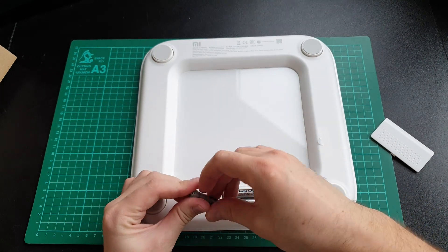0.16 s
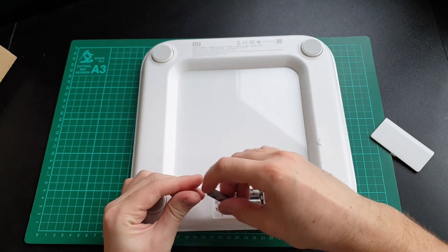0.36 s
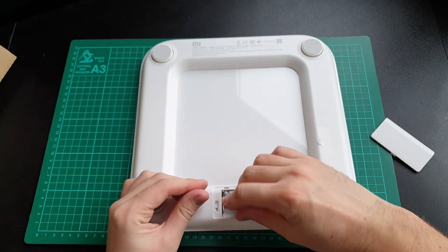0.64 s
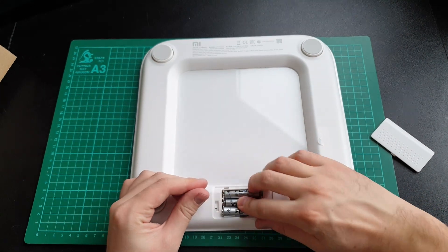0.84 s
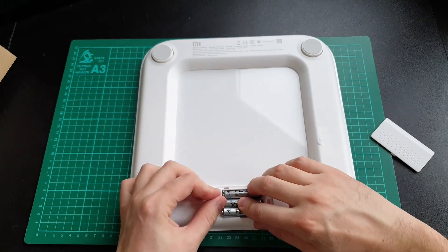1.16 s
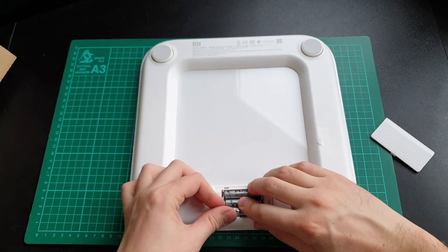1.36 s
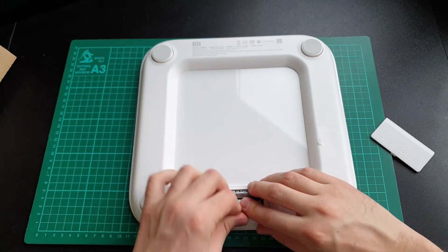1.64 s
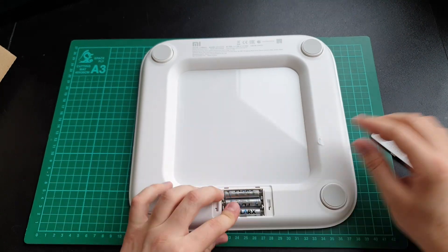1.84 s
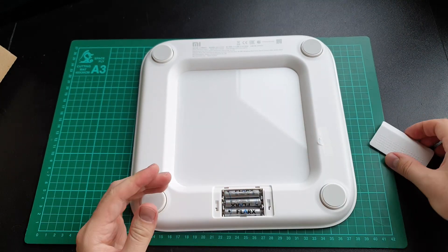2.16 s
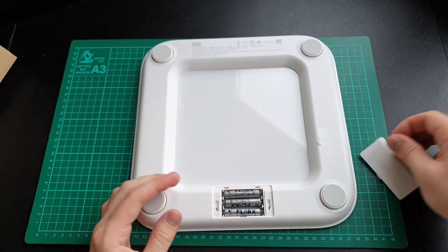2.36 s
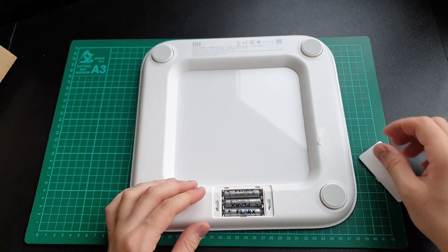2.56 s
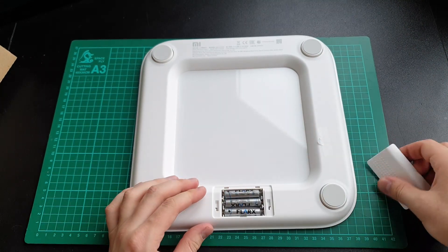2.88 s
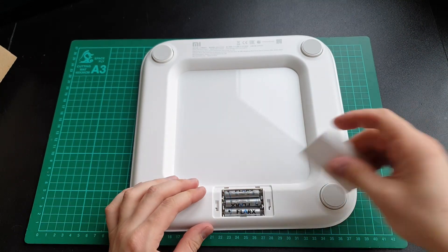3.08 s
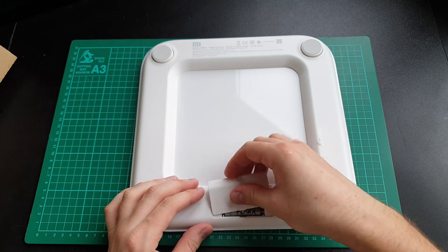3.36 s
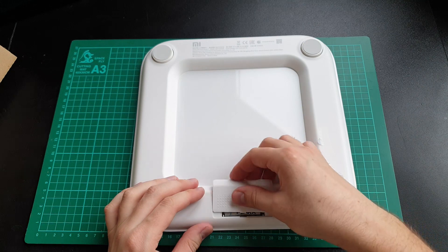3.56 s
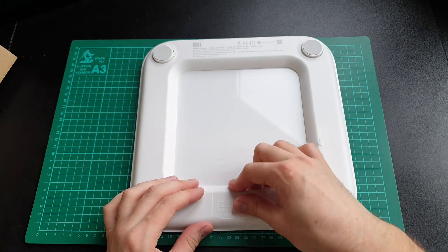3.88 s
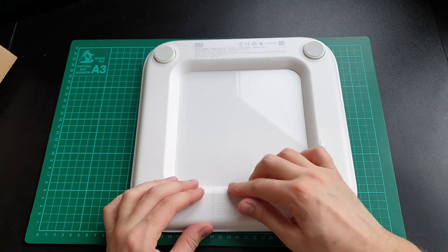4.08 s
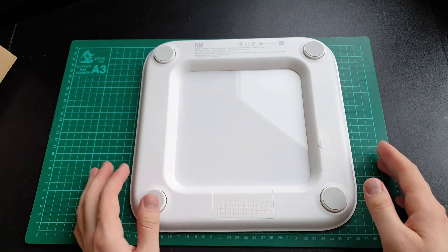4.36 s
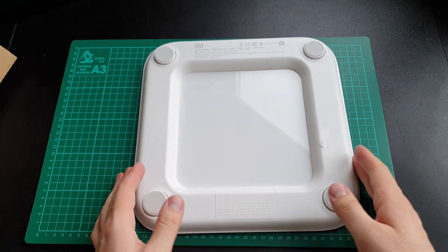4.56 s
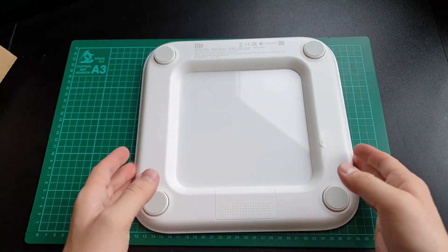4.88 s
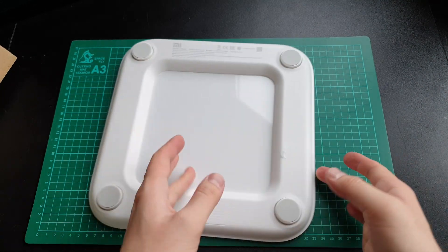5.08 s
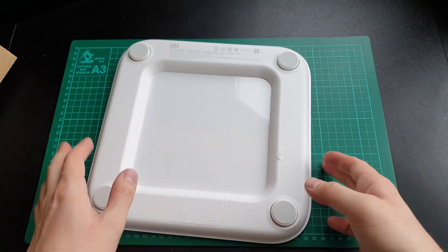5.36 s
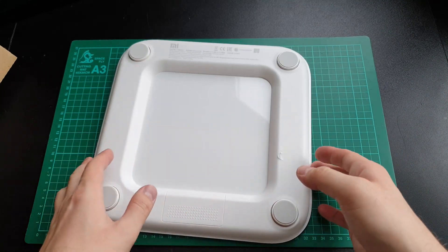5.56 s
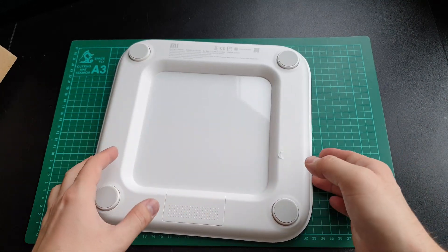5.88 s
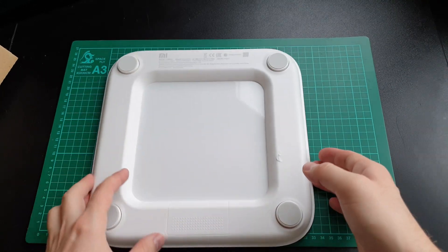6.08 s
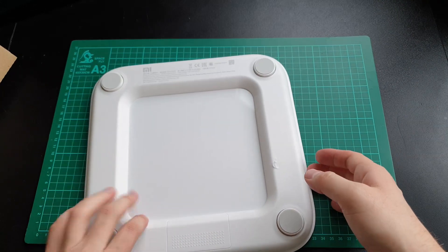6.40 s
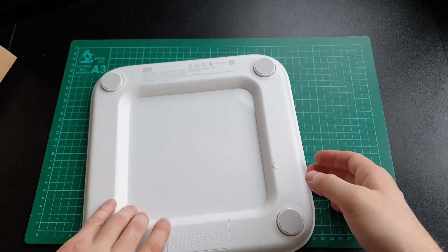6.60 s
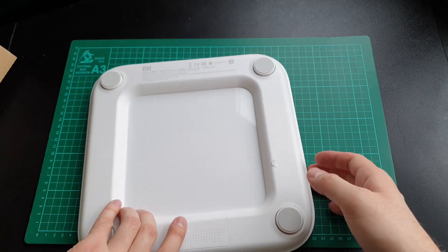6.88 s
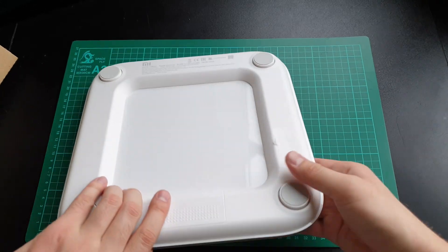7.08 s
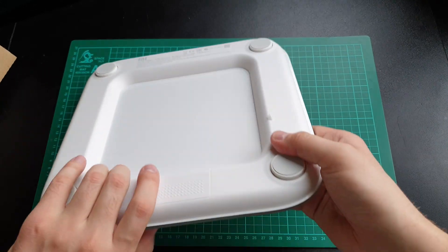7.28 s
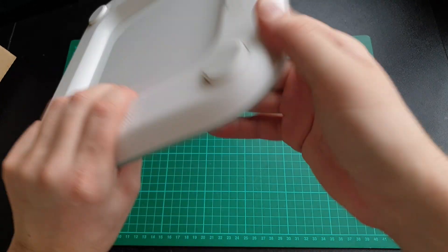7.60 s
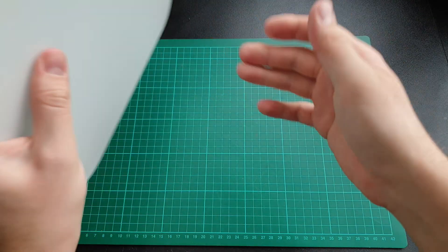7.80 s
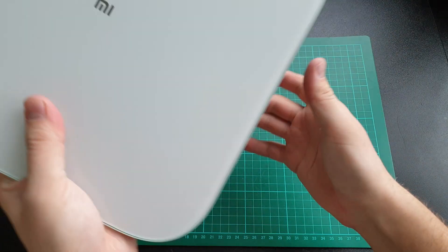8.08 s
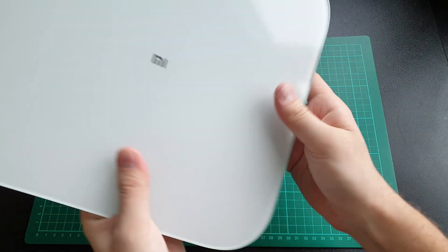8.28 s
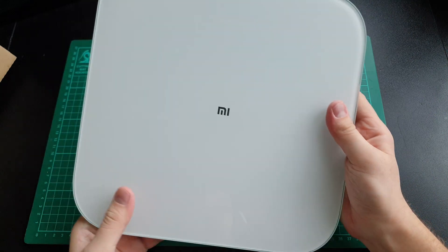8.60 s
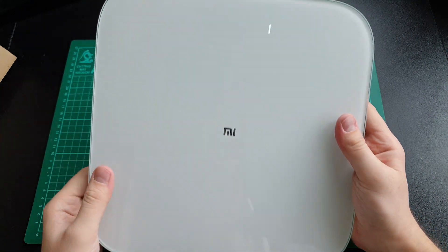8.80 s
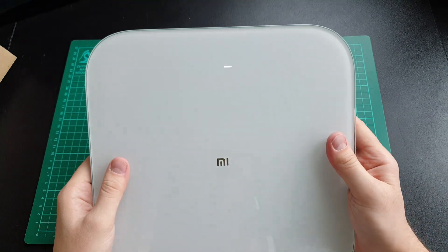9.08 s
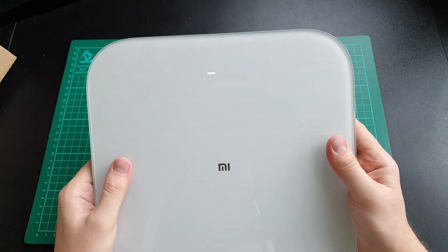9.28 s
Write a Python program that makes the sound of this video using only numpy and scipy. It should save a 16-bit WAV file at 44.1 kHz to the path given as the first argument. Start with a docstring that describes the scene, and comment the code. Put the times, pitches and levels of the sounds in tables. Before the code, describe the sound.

Hard plastic clicks and clatters, one loud snap of a cover, then soft rubbing, dull desk thumps and a hand slap on a plate.

```python
"""Batteries and a lid click into the hollow plastic shell of a scale lying on a desk, in a small quiet room:
bursts of micro-impacts ring the shell modes. Then hands slide the scale over the mat, lift it and turn it over:
random slips rub as skin and scrape the shell, uneven jerks judder, and the low modes of the desk top boom.
Late on, the plate is slapped into the hand and flutters over a hollow note until the grip lets go.
Sparse echoes and a steady faint hush of shaped noise lie under it all."""
import sys
import numpy as np
from scipy import signal
from scipy.fft import rfft, irfft
from scipy.io import wavfile
from scipy.ndimage import uniform_filter1d

SR = 44100
rng = np.random.default_rng(int(sys.argv[2]) if len(sys.argv) > 2 else 0)


def wav_record(signal):
    """Record a signal, one row per channel, as 16-bit PCM in the file named by sys.argv[1]."""
    frames = np.transpose(np.atleast_2d(signal))
    bounded = np.clip(frames, -1, 1)
    # unit amplitude maps onto the largest positive 16-bit level
    quanta = np.round(bounded * 32767).astype(np.int16)
    wavfile.write(sys.argv[1], SR, quanta)


def boost_factor(decibels):
    """Convert a level in decibels to a linear amplitude factor."""
    exponent = np.asarray(decibels, float) / 20
    return 10 ** exponent


N = 416744


def evened(x):
    """Scales to rms 1."""
    return x / np.sqrt(np.mean(x ** 2) + 1e-20)


def read(points, hz):
    """Value of a spectrum at hz, on a log axis."""
    f, value = np.transpose(points)
    return np.interp(np.log(hz + 1), np.log(f + 1), value)


def add(mix, s, sound):
    """Mixes a sound in at time s."""
    part = mix[:, round(s * SR):][:, :sound.shape[1]]
    part += sound[:, :part.shape[1]]


# Left-right likeness of diffuse sound. Each row: frequency in Hz, likeness 0 to 1.
ALIKE = [(60, 0.86), (290, 0.58), (640, 1), (1200, 0.), (8000, 0.071)]


def likened(first, other, hz):
    """Pairs two unrelated spectra, alike as far as diffuse sound is at each frequency."""
    same = read(ALIKE, hz)
    return np.array([first, same * first + np.sqrt(1 - same ** 2) * other])


def diffuse(x, gain, size=512):
    """Colours two unrelated channels by gain(hz, t) and makes them alike in the bass."""
    hz, t, z = signal.stft(x, SR, nperseg=size, noverlap=3 * size // 4)
    z = likened(z[0], z[1], hz[:, None]) * gain(hz[:, None], t)
    return signal.istft(z, SR, nperseg=size, noverlap=3 * size // 4)[1][:, :x.shape[1]]


def near(hz, centre_hz, octaves):
    """The place of contact favours the modes near one pitch."""
    return np.exp(-.5 * (np.log2((hz + 1) / centre_hz) / octaves) ** 2)


def response(modes, hz):
    """Complex response of each resonant mode, one row a mode."""
    f, width, db = np.transpose(modes)[:, :, None]
    return boost_factor(db) * 1j * hz * width / (f ** 2 - hz ** 2 + 1j * hz * width)


def chatter(noise, t, decay_s):
    """Spectrum of a burst of micro-impacts, nearly even over frequency."""
    z = rfft(noise * np.exp(-t / decay_s))
    even = irfft(z / (abs(z) + 0.12 * abs(z).mean()))
    return rfft(even * np.exp(-t / (4 * decay_s)))


def stroke(t, s, db, rise_s, fall_s):
    """Gain of one stroke, straight in dB up to its peak and down; rise and fall are times for 20 dB."""
    return boost_factor(db - 20 * np.maximum((s - t) / rise_s, (t - s) / fall_s))


def strokes(rows, t):
    """Summed gain of overlapping strokes, and their last column weighted by power."""
    s, db, rise_s, fall_s, value = np.transpose(rows)[:, :, None]
    power = stroke(t, s, db, rise_s, fall_s) ** 2 + 1e-30
    return np.sqrt(power.sum(0)), (power * value).sum(0) / power.sum(0)


def patchy(hz, t, db):
    """The colour drifts at random, in soft patches of time and pitch."""
    field = rng.standard_normal((len(hz), len(t)))
    field = uniform_filter1d(uniform_filter1d(field, size=6, axis=0), size=40, axis=1)
    return boost_factor(db * evened(field))


def grit(per_s, spread_db):
    """Tiny slips of uneven size at random times, two unrelated channels, rms 1."""
    slips = (rng.random((2, N)) < per_s / SR) * rng.standard_normal((2, N))
    return evened(slips * boost_factor(spread_db * np.minimum(rng.exponential(1, N), 4)))


# Hard contacts. Each row: time in seconds, ring peak in dB, centre of the ring in Hz,
# crack in dB above the ring, low knock in dB above the ring.
CLICKS = [(0.495, -24, 1278, -13, -21.5), (0.505, -27, 1230, -10, -12.5), (0.556, -29.5, 1258, -6, -25.5),
          (0.652, -42, 1214, -20, -13.5), (0.662, -34, 1301, -5.5, -3.5), (0.689, -3.5, 1654, -5.5, -25.5),
          (0.76, -33, 1071, -19, -26), (0.77, -22.5, 1322, -16, -35), (1.087, -42.5, 1079, -28, -27.5),
          (1.096, -43.5, 1264, -18, -5.5), (1.138, -32, 1035, -26, -21.5), (1.342, -30, 1131, -9.5, -23.5),
          (1.542, -21, 1250, -0.5, -20.5), (1.698, -16, 1559, -5.5, -13), (1.997, -41.5, 1210, -38, -23),
          (2.066, -40.5, 1150, -15.5, -13), (2.26, -34.5, 1200, -16, -31), (2.287, -30.5, 1264, -3, -20),
          (2.308, -22, 2166, 4, -18.5), (2.352, -38, 1010, 15.5, -8.5), (2.379, -24.5, 1420, 8, -19),
          (2.388, -20.5, 1130, 7, -14.5), (2.469, -36, 1260, -27.5, -37.5), (2.672, -43, 1081, -11, -9.5),
          (2.723, -34, 1220, -11, -8), (2.819, -45.5, 1202, -34, -6), (2.92, -40, 1390, 0, -20.5),
          (3.284, -28, 1200, 5, -17.5), (3.293, -26.5, 1312, -3, -12.5), (3.366, -43.5, 1150, -0.5, -7),
          (3.398, -29.5, 1463, -10.5, -28), (3.468, -33.5, 1291, -6.5, -23.5),
          (3.494, -15.5, 1497, -7, -30.5), (3.613, -38, 2932, 7, -21.5), (3.638, -39.5, 1248, -16, -24),
          (3.687, -44.5, 1610, -16.5, -27.5), (3.708, -33.5, 1048, -11.5, -28),
          (3.889, -8.5, 1030, -1, -19), (4.177, -42, 950, -31, -17), (4.528, -72, 790, 10, -10.5),
          (4.898, -30.5, 1150, -6.5, 4), (4.937, -41, 905, -1, -4), (4.985, -50.5, 1050, -20, 7),
          (5.022, -40, 1100, -15, -5), (5.06, -49.5, 950, -20, 6.5), (5.117, -56, 940, 6, -6),
          (5.418, -61, 1287, -5, 7), (5.865, -62.5, 1230, -10.5, 0.5), (6.065, -52, 700, -15, 4),
          (6.192, -64, 1127, -3, 2), (6.84, -56.5, 1348, -24, -19.5), (6.93, -57.5, 1026, -27.5, -27.5),
          (7.167, -48.5, 1185, -17, -10), (7.27, -39, 1036, -27, -13), (8.097, -59, 2900, 8.5, -26.5),
          (8.258, -54.5, 1360, -7.5, 3), (8.367, -51, 1490, 4, -24), (8.496, -43.5, 1090, 8, -31),
          (9.016, -41, 1010, -7.5, 5)]
# Modes of the plastic shell. Each row: frequency in Hz, width in Hz, relative level in dB.
SHELL = [(538.7, 180, -8.5), (700, 180, -5.5), (836, 110, 0), (1010, 190, 3.5), (1124, 260, 2.5),
         (1250, 87, 3), (1480, 85, -3.5), (1650, 130, -3.5), (1830, 110, 0), (2130, 170, -2),
         (2323, 250, -4), (2574, 140, -2), (2900, 790, -1.5), (3200, 1600, -6), (3820, 130, -9),
         (4250, 350, -13.5), (4770, 450, -13)]
# Crack spectrum. Each row: frequency in Hz, relative level in dB per Hz.
CRACK = [(1470, -32.5), (2500, -3), (3270, -2), (3710, -2.5), (6450, -1.5), (10200, -10.5), (12000, -5.5),
         (12900, -17), (15700, -11.5), (16500, -22.5)]
# The whole shell flexing. Each row: frequency in Hz, relative level in dB per Hz.
KNOCK = [(150, -4), (250, 7), (400, 8.5), (650, 5.5), (1000, -53)]
# Modes of the loose lid. Each row: frequency in Hz, width in Hz, relative level in dB among themselves.
LID = [(3085, 30, -9.5), (4560, 60, 1.5), (5030, 48, -0.5), (5250, 19, -17), (6310, 73, -3),
       (7710, 480, -10), (11750, 79, -3), (12650, 100, -7.5), (14800, 120, -8)]
LID_LOOSE_START_S, LID_LOOSE_END_S = 2.27, 2.95  # the lid clatters on the mat
CRACK_TOP_HZ = 9000  # where a middling crack turns dull; harder ones reach higher
RATTLE_DB, RATTLE_DB_PER_DB = -0.5, 0.13  # room feed over the click; harder blows rattle on more


def clicks(size=4096):
    """Milliseconds of chatter ring the shell, with a bright crack and a low knock; row 3 feeds the room."""
    t, hz = np.arange(size) / SR, np.fft.rfftfreq(size, 1 / SR)
    out = np.zeros((3, N))
    modes, mode_hz = response(SHELL, hz), np.transpose(SHELL)[0]
    signs = (-1) ** np.arange(len(SHELL))
    late = np.exp(-2j * np.pi * hz * .002)  # 2 ms delay, undone when mixed in
    for s, db, ring_hz, crack_db, knock_db in CLICKS:
        noise = rng.standard_normal((5, size))
        strength_db = db + 30
        # harder blows chatter longer and wake more modes
        length_s = .0016 * boost_factor(0.38 * strength_db)
        octaves = 0.35 * boost_factor(0.38 * strength_db)
        weights = (near(mode_hz, ring_hz, octaves) + 0.084) * signs
        left, other = chatter(noise[:2], t, length_s)
        ring = irfft(likened(left, other, hz) * (weights @ modes) * late)

        bright = boost_factor(read(CRACK, hz))
        if LID_LOOSE_START_S < s < LID_LOOSE_END_S:
            bright = bright + 4 * response(LID, hz).sum(0)
        tick = chatter(noise[2:4], t, .0004)  # the first touch is a single sharp tick
        burst = chatter(noise[2:4], t, 2.8 * length_s) + 0.26 * tick
        top_hz = CRACK_TOP_HZ * boost_factor(0.9 * (strength_db + crack_db + 8.5))
        crack = irfft(burst * bright * late / (1 + (hz / top_hz) ** 2))

        flex = chatter(noise[4:], t, 0.0045) * boost_factor(read(KNOCK, hz))
        knock = irfft(flex * late ** 2)  # 2 ms behind the ring
        click = np.zeros((2, size))
        for part_db, part in ((0, ring), (crack_db, crack), (knock_db, knock)):
            peak = max(abs(part.mean(0)).max(), abs(part).max() / 2)
            click += boost_factor(db + part_db) * part / peak
        rattle = boost_factor(RATTLE_DB + RATTLE_DB_PER_DB * (strength_db - 20)) * click[:1]
        add(out, s - .002, np.vstack([click, rattle]))
    return out[:2], out[2]


def scrape(rows, octaves, per_s, spread_db):
    """Slips excite the shell modes around a wandering pitch."""
    def gain(hz, t):
        level, centre_hz = strokes(rows, t)
        focus = near(hz, centre_hz, octaves) + 0.46 * octaves * near(hz, 1500, octaves=0.93)
        shell = abs(response(SHELL, hz[:, 0])).sum(0)[:, None]
        colour = (shell + 4.5) * focus
        return level * patchy(hz, t, db=3.0) * colour / np.sqrt((colour ** 2).mean(0))
    return diffuse(grit(per_s, spread_db), gain)


# Each row: peak time in seconds, level in dB, rise in seconds, fall in seconds, centre of the ring in Hz.
GRAZES = [(.548, -50, 0.038, 0.11, 1250), (.67, -42, 0.038, 0.17, 1410), (1.074, -53.5, 0.022, 0.039, 1030),
          (1.612, -56.5, 0.26, 0.12, 1180), (1.9, -67, 0.094, 0.24, 1300), (2.0, -54.5, .012, 0.043, 1163),
          (2.038, -41, .03, .09, 1160), (2.256, -39.5, 0.017, 0.075, 1250), (2.5, -68, 0.105, .1, 1190),
          (2.68, -49, 0.0079, 0.082, 1244), (2.732, -34.5, 0.027, 0.018, 1210),
          (2.848, -54, 0.12, 0.029, 1220), (2.925, -44.5, 0.018, 0.055, 2050), (3.582, -49, .1, .13, 1363),
          (5.5, -69.5, 0.04, 0.15, 1200), (6.02, -81, 0.079, 0.091, 1180), (7.474, -67, 0.083, 0.11, 1054),
          (7.61, -66.5, 0.11, 0.052, 990)]


def grazes():
    """Narrow grainy shell rings from sparse slips: grazes and the dying tails of clicks."""
    return scrape(GRAZES, octaves=0.24, per_s=830, spread_db=3.0)


# Each row: peak time in seconds, level in dB, rise in seconds, fall in seconds, centre of the ring in Hz.
SLIDES = [(3.48, -53.5, 0.012, 0.083, 1600), (4.3, -76.5, .1, 0.14, 612), (4.534, -76, 0.18, 0.086, 1650),
          (4.635, -63.5, 0.036, .2, 622), (4.776, -50.5, 0.13, 0.11, 756), (4.86, -54.5, .15, .15, 630),
          (4.9, -47, 0.026, 0.11, 585), (5.02, -45, 0.091, 0.06, 1000), (5.08, -49, .1, 0.017, 920),
          (5.37, -71.5, 0.018, 0.082, 597), (5.44, -68.5, 0.027, 0.11, 850),
          (5.648, -51.5, 0.0067, 0.091, 563), (5.704, -42.5, 0.054, 0.035, 600),
          (5.868, -70, 0.0099, 0.22, 685), (6.09, -55.5, 0.061, 0.067, 607), (6.198, -65.5, .03, 0.16, 880),
          (6.44, -71.5, 0.047, 0.21, 1203), (6.58, -68.5, 0.26, 0.063, 1291),
          (6.846, -65.5, 0.042, 0.078, 1350), (6.93, -62.5, 0.021, .1, 1230),
          (7.166, -55, 0.0082, 0.065, 1220), (7.272, -51, 0.012, 0.057, 990), (7.71, -69, .025, 0.046, 575),
          (7.8, -78.5, .05, 0.46, 985), (8.102, -70.5, 0.016, 0.047, 2177),
          (8.265, -63.5, 0.016, 0.25, 1340), (8.375, -70, 0.01, .2, 1790), (8.44, -58, 0.14, 0.034, 2250),
          (8.498, -39.5, 0.0063, 0.015, 1180), (8.54, -73, 0.041, 0.1, 670),
          (8.75, -72.5, 0.098, 0.14, 1500), (8.96, -68.5, 0.23, 0.051, 2380),
          (9.016, -48.5, 0.0058, 0.041, 496), (9.346, -72.5, 0.74, 0.67, 1000)]


def slides():
    """The whole scale is dragged or gripped: denser slips, a wide ring."""
    return scrape(SLIDES, octaves=0.79, per_s=1400, spread_db=1.0)


# Skin and sleeve sliding. Each row: peak time in seconds, level in dB, rise in seconds, fall in seconds,
# air above about 8 kHz in dB relative to the body.
RUBS = [(.718, -46, 0.035, .14, -2.5), (1.16, -72.5, 0.33, 0.19, -20), (1.704, -64, 0.38, 0.11, -4),
        (1.914, -69, 0.0085, 0.061, -30), (2.064, -61, 0.054, 0.07, -3.5), (2.26, -54.5, .025, 0.075, 2),
        (2.41, -49.5, 0.073, 0.062, 7.5), (2.7, -53.5, 0.015, 0.11, -6.5), (2.752, -52, 0.034, 0.023, -21),
        (2.924, -45.5, .02, 0.058, -6.5), (3.072, -68, .3, 0.053, 4), (3.194, -72.5, 0.056, 0.062, -2),
        (3.342, -51, 0.029, 0.13, -7.5), (3.578, -66.5, .055, 0.34, 1.5), (4.05, -67, 0.22, .2, 1.5),
        (4.35, -77.5, 0.13, .3, 1.5), (4.44, -76, 0.093, 0.091, 7.5), (4.52, -70, 0.07, 0.078, 4),
        (4.81, -55.5, 0.09, 0.093, -25.5), (4.9, -55, 0.02, 0.028, -10), (5.06, -51.5, 0.42, 0.091, -2),
        (5.34, -70, 0.092, 0.076, -5), (5.45, -60.5, 0.05, 0.056, -16), (5.71, -64, 0.076, 0.052, -5),
        (6.12, -75, 0.27, 0.12, -4.5), (6.21, -73, 0.051, 0.34, -8), (6.33, -71, 0.095, .07, 3.5),
        (6.44, -67, 0.058, 0.14, -2.5), (6.56, -62, 0.068, 0.091, 1), (6.84, -78, 0.071, 0.092, -11),
        (6.99, -78.5, .17, 0.14, -5), (7.17, -68.5, 0.047, .07, -11.5), (7.32, -63, 0.14, 0.11, -1),
        (7.48, -69, .1, 0.064, -5), (7.59, -50.5, 0.046, 0.059, 5), (7.81, -68, 0.047, 0.069, -5),
        (7.9, -70.5, 0.1, 0.11, -3), (8.1, -59.5, 0.0091, 0.067, -19.5), (8.31, -63, 0.084, 0.23, -4.5),
        (8.45, -48.5, 0.091, 0.1, -1), (8.51, -52.5, 0.21, 0.042, 1), (8.74, -56.5, 0.19, .3, -0.7),
        (8.62, -67.5, .1, .2, 4.5), (8.9, -60.5, .3, .15, 1.5), (9.03, -56, .07, 0.035, -4.5),
        (9.32, -76.5, 0.16, 0.22, -25)]
# Skin spectrum. Each row: frequency in Hz, relative level in dB per Hz.
SKIN = [(710, -33), (1200, -7.5), (1690, -5.5), (2760, -8), (6860, 1.5), (8360, -9.5), (11500, -7),
        (15100, -10.5), (16000, -7), (16500, -29)]


def rub():
    """Fine dense slips of skin: a soft hiss whose airiness varies from stroke to stroke."""
    def gain(hz, t):
        level, air_db = strokes(RUBS, t)
        airy = 1 / (1 + (8300 / (hz + 1)) ** 12)
        skin = boost_factor(read(SKIN, hz))
        body, air = (part / np.sqrt((part ** 2).mean()) for part in (skin * (1 - airy), skin * airy))
        return level * patchy(hz, t, db=1.5) * (body + boost_factor(air_db) * air)
    return diffuse(grit(per_s=13000, spread_db=3.0), gain, size=256)


# Rubber and glass juddering over the mat. Each row: start in seconds, end in seconds,
# base rate in slips per second (spacings are 0.46 to 1.2 of its period), full-push jerk peak in dB before scatter.
JUDDERS = [(4.911, 5.086, 55, -47), (5.63, 5.721, 170, -40), (6.055, 6.128, 130, -44.5)]
# Jerk spectrum. Each row: frequency in Hz, relative level in dB per Hz.
JUDDER = [(150, -2), (300, 9.5), (620, 12.5), (1000, -7.5), (1600, -28), (2400, -9.5), (3500, -20),
          (6000, -55), (12000, -39.5)]


def judder(size=1024):
    """Unevenly spaced stick-slip jerks, growing through the push."""
    train = np.zeros((2, N))
    for start, end, per_s, db in JUDDERS:
        at = start + np.cumsum(rng.uniform(0.46, 1.2, 40) / per_s)
        push = .5 + .5 * (at - start) / (end - start)
        sizes = boost_factor(db + 2.5 * rng.standard_normal(40)) * push
        keep = at < end
        train[:, (at[keep] * SR).astype(int)] = sizes[keep]
    t, hz = np.arange(size) / SR, np.fft.rfftfreq(size, 1 / SR)
    late = np.exp(-2j * np.pi * hz * 0.00286)
    jerk = irfft(chatter(rng.standard_normal((1, size)), t, 0.0022) * boost_factor(read(JUDDER, hz)) * late)
    return signal.fftconvolve(train, jerk / abs(jerk).max(), axes=1)[:, :N]


# Modes of the slapped plate. Each row: frequency in Hz, width in Hz, relative level in dB.
PLATE = [(950, 27, -5), (1030, 24, 9.5), (1062, 24, 8), (1150, 36, -17)]
SLAP_S, DRUM_S, RELEASE_S = 8.5, 8.535, 8.75  # slap, top of the hollow note, grip let go
DRUM_HZ, DRUM_WIDTH_HZ = 394, 40


def plate():
    """Noise in close modes flutters at random as it dies, until the grip lets go; a hollow note swells under."""
    t, hz = np.arange(N) / SR, np.fft.rfftfreq(N, 1 / SR)
    z = rfft(rng.standard_normal((2, 2, N)))
    high = evened(irfft(z[0] * response(PLATE, hz).sum(0), N))
    hollow = response([(DRUM_HZ, DRUM_WIDTH_HZ, 0)], hz)[0] ** 2
    low = evened(irfft(z[1, 0] * hollow, N))
    release = np.clip((RELEASE_S - t) / 0.021, 0, 1)
    flutter = stroke(t, SLAP_S, db=-51.5, rise_s=0.0073, fall_s=0.347) * release * high
    return flutter + stroke(t, DRUM_S, db=-45, rise_s=.03, fall_s=.035) * low


# Weight landing on the desk. Each row: time in seconds, first-mode peak in dB, boost of the upper modes in dB.
THUMPS = [(0.515, -59, 6), (0.691, -38.5, -8), (0.76, -47, 5.5), (1.09, -57.5, -5), (1.541, -32.5, -9.5),
          (1.697, -39, 3.5), (1.939, -54, -15.5), (2.401, -57.5, 9.5), (2.702, -58, 12.5), (3.284, -57, -7),
          (3.708, -54, -6), (3.887, -41, 6.5), (4.307, -59.5, -10.5), (4.419, -50.5, -26),
          (4.449, -43.5, -4), (4.706, -49.5, -13.5), (4.898, -40.5, 10.5), (4.939, -31.5, -5),
          (5.061, -36, -6), (5.37, -59, 1), (5.427, -47, 4), (5.489, -55, -5), (5.651, -52.5, 4.5),
          (6.075, -64, 10), (6.219, -48, -23), (6.444, -38.5, -8), (6.311, -60, -10), (6.525, -49, -8),
          (6.828, -56.5, 6), (7.125, -54, 2.5), (7.166, -45, 11.5), (7.243, -51, 4), (7.739, -59.5, -21.5),
          (8.279, -52, 3), (9.02, -24.5, 2.5), (9.367, -55, -4.5)]
# Modes of the desk top. Each row: frequency in Hz, relative level in dB, undamped t60 in seconds.
DESK = [(61.7, -1.5, 0.36), (77, -10, 0.15), (122.7, 1.5, 0.13), (195, -18, 0.12), (242, -16, 0.093),
        (312, -20, 0.096)]
# Low murmur of the desk top, faint thumps included. Each row: time in seconds, level in dB.
MURMUR = [(0.0, -76.5), (1.47, -78), (1.6, -52.5), (1.72, -71), (2.05, -77), (2.97, -73.5), (3.3, -79),
          (3.47, -64), (3.87, -73.5), (4.42, -67), (4.8, -52), (4.92, -62), (5.03, -42), (5.16, -68.5),
          (6.5, -66.5), (7.5, -71.5), (9.0, -74), (9.2, -59.5), (9.45, -65)]
THUMP_RISE_S = .013
THUMP_STOP_S = .16  # the hands damp the desk: 20 dB more is lost by then


def desk():
    """Soft blows ring the low modes of the desk top; noise through the same modes, heavily damped, murmurs."""
    t, out = np.arange(SR // 2) / SR, np.zeros((2, N))
    hz, db, t60_s = np.transpose(DESK)[:, :, None]
    lead = np.array([.2, -.2])[:, None, None]  # radians: left leads right slightly in phase
    tones = boost_factor(db) * np.sin(2 * np.pi * hz * t + lead)
    rings = tones * boost_factor(-60 * t / t60_s - 20 * (t / THUMP_STOP_S) ** 2)
    rise = 1 - np.exp(-(t / THUMP_RISE_S) ** 2)
    first_peak = abs(rings[0, 0] * rise).max()
    for s, peak_db, upper_db in THUMPS:
        blow = rings[:, 0] + boost_factor(upper_db) * rings[:, 1:].sum(1)
        add(out, s - .004, boost_factor(peak_db) * blow * rise / first_peak)
    damped = (tones * np.exp(-t / 0.0067) * boost_factor(-.03 * hz)).sum(1)
    murmur = signal.fftconvolve(rng.standard_normal((1, N)), damped, axes=1)[:, :N]
    murmur_db = np.interp(np.arange(N) / SR, *np.transpose(MURMUR))
    return (out + boost_factor(murmur_db) * evened(murmur)) * boost_factor([[-.5], [.5]])  # right 1 dB louder


# Decay of the first echoes. Each row: frequency in Hz, t60 in seconds.
ROOM = [(250, 0.37), (1000, 0.13), (2000, 0.23), (5000, 0.21), (12000, 0.16)]
LATE_DB, LATE_T60_S = -21.5, 0.43  # a weak slower tail under the first echoes


def room(x, count=3):
    """Sparse echoes, each band dying at its own speed; slow turns share the sound among several tails."""
    def decay(hz, t):
        early = boost_factor(-60 * t / read(ROOM, hz))
        return (early + boost_factor(LATE_DB - 60 * t / LATE_T60_S)) * np.minimum(t / 0.0011, 1)
    out, turn = np.zeros((2, N)), np.arange(N) / SR * 2.3
    slots = np.arange(120, SR // 2 - 10, 10)
    for k in range(count):
        taps = np.zeros((2, SR // 2))
        at = slots + rng.integers(0, 10, (2, len(slots)))
        np.put_along_axis(taps, at, rng.choice([-1., 1.], at.shape), 1)
        tail = diffuse(taps, decay, size=128)
        share = np.sqrt(2 / count) * np.cos(np.pi * (turn + k / count))
        out += signal.fftconvolve((x * share)[None], tail / np.linalg.norm(tail[0]), axes=1)[:, :N]
    return out


# Room tone and microphone hiss. Each row: frequency in Hz, relative level in dB per Hz.
HUSH = [(15, -34.5), (25, -9.5), (53, 1.5), (95, -10), (131, -16.5), (214, -10.5), (232, -26), (259, -11.5),
        (304, -24.5), (349, -11.5), (378, -26.5), (600, -23), (8370, -38.5), (14800, -25), (16500, -50.5)]
HUSH_DB = -74


def hush():
    """Steady faint background: noise shaped by one fixed spectrum."""
    noise = diffuse(rng.standard_normal((2, N)), lambda hz, t: boost_factor(read(HUSH, hz)), size=2048)
    return boost_factor(HUSH_DB) * evened(noise)


def scene():
    """Hard and soft contacts with their room, over the desk and the hush."""
    hard, rattling = clicks()
    soft = grazes() + slides() + rub() + judder() + plate()
    echoes = room(rattling + boost_factor(-7.5) * soft[0])
    return hard + soft + echoes + desk() + hush()


def roll_off(x):
    """The treble ends steeply here."""
    return signal.sosfilt(signal.butter(12, 16970, fs=SR, output="sos"), x)


def record(dry):
    """The microphones drop the deepest bass; peaks clip at full scale."""
    heard = signal.sosfilt(signal.butter(2, 42, "high", fs=SR, output="sos"), dry)
    return roll_off(np.clip(heard, -1, 1))


dry = scene()
out = record(dry)
wav_record(out)
```